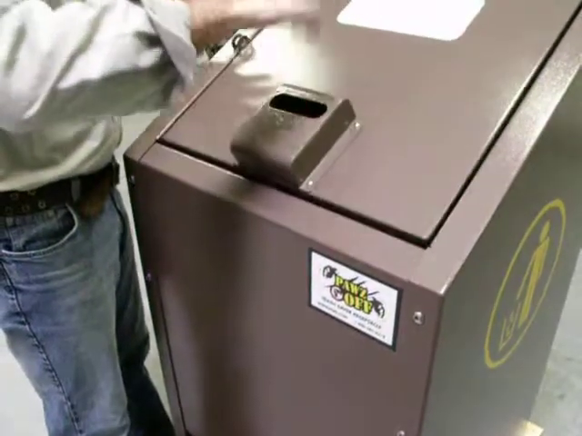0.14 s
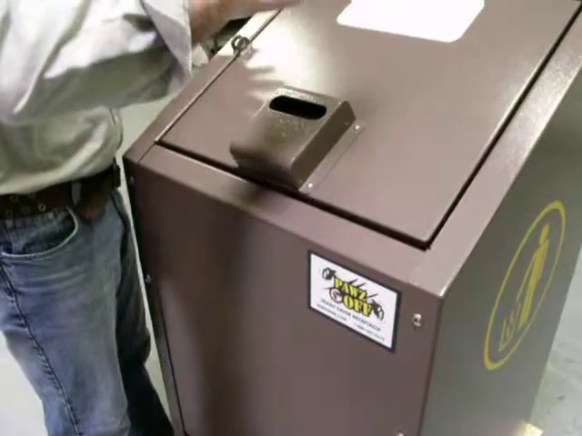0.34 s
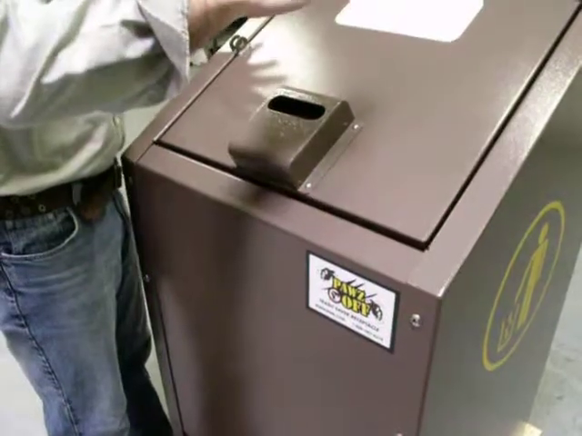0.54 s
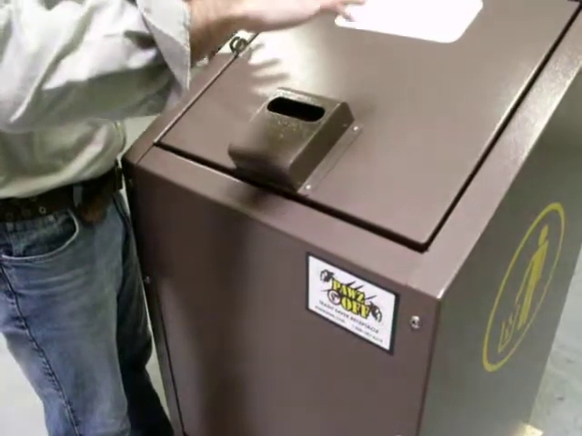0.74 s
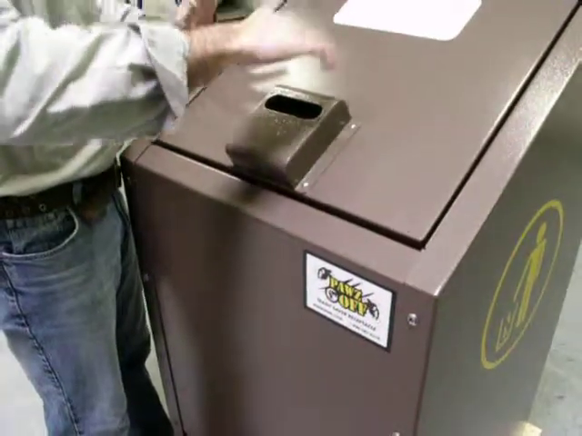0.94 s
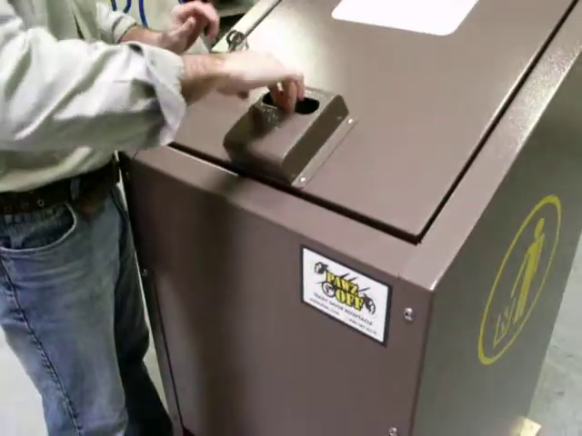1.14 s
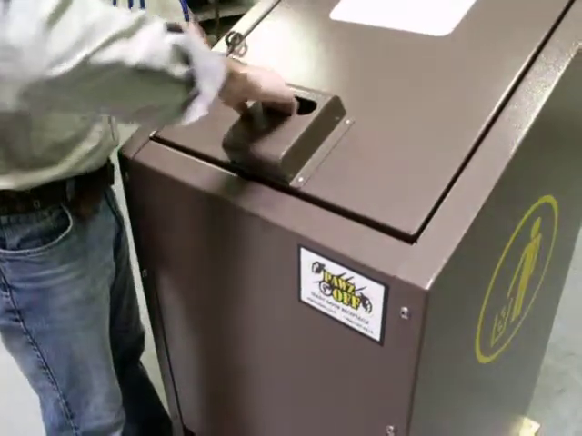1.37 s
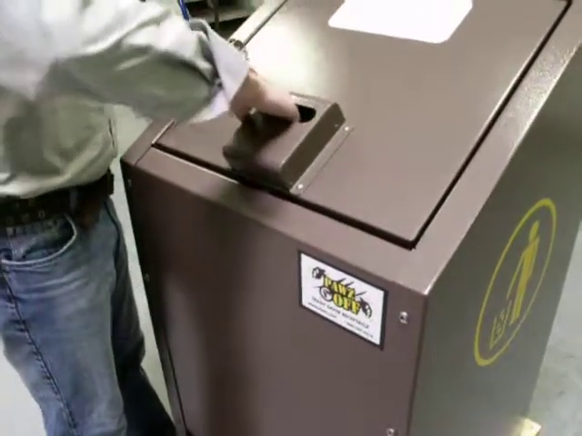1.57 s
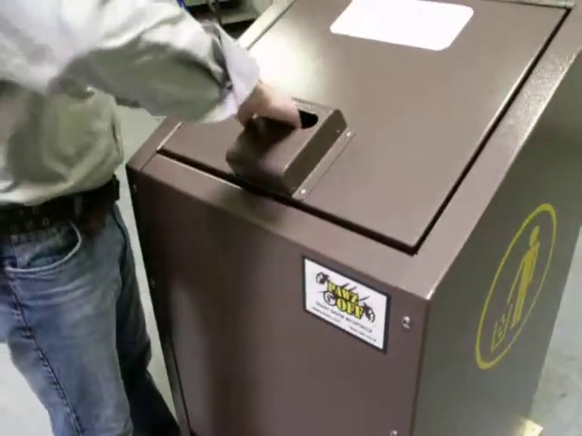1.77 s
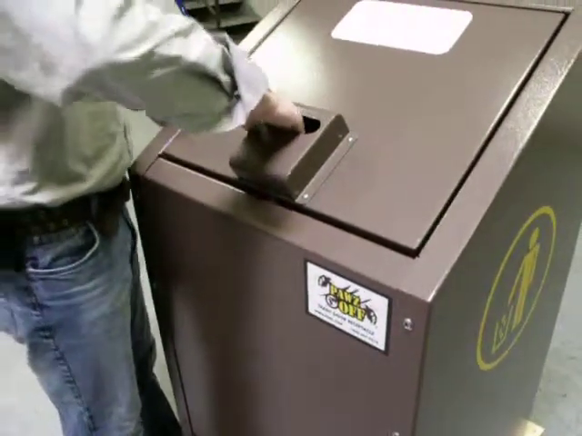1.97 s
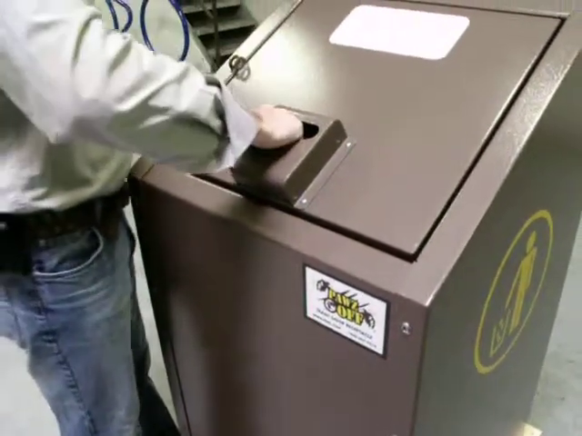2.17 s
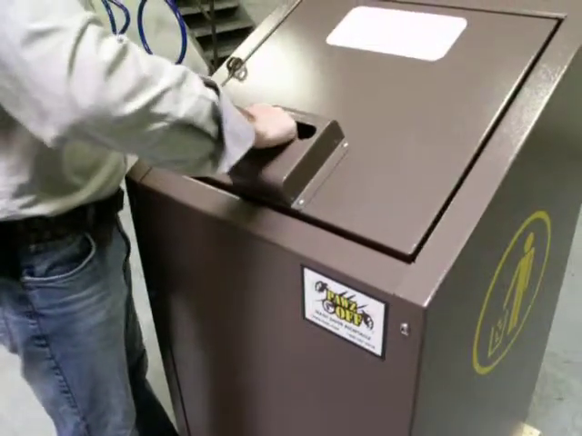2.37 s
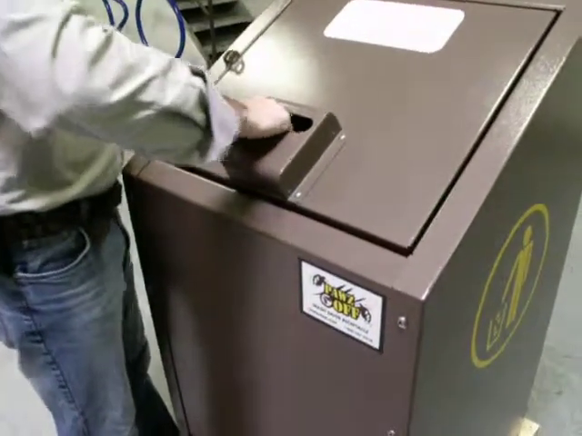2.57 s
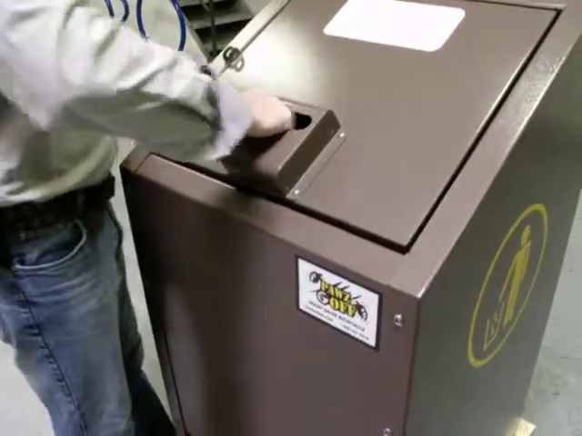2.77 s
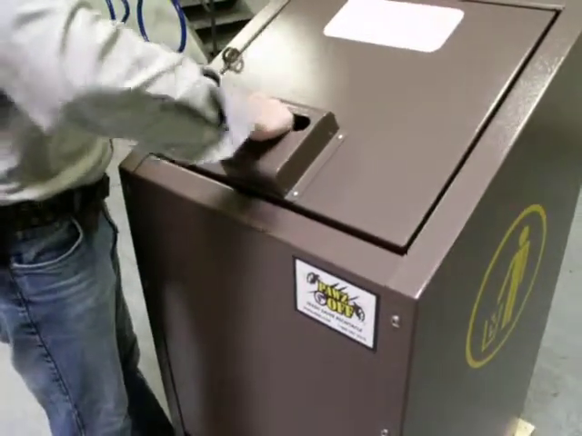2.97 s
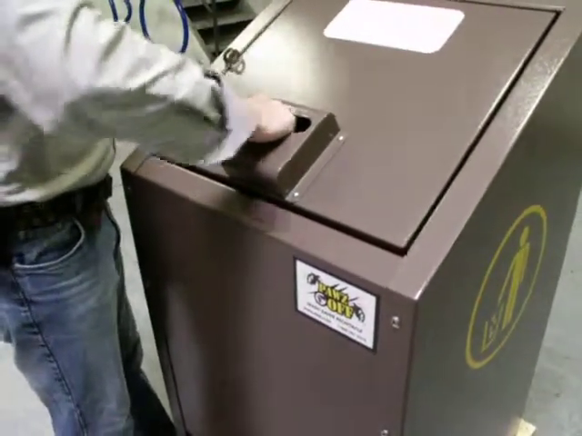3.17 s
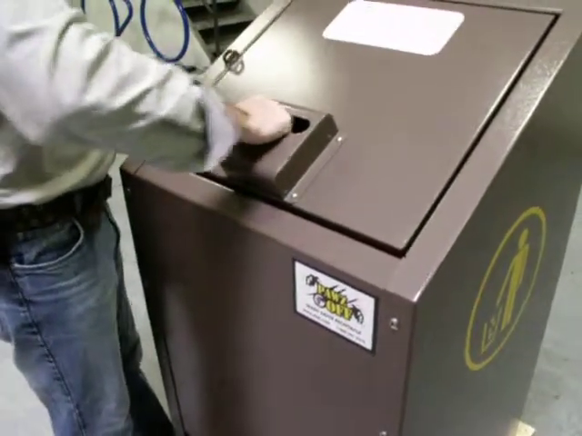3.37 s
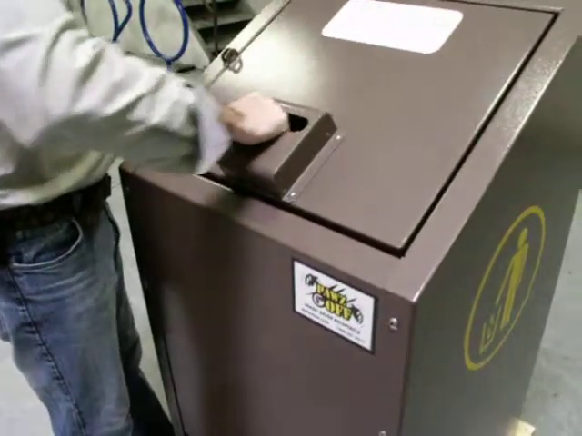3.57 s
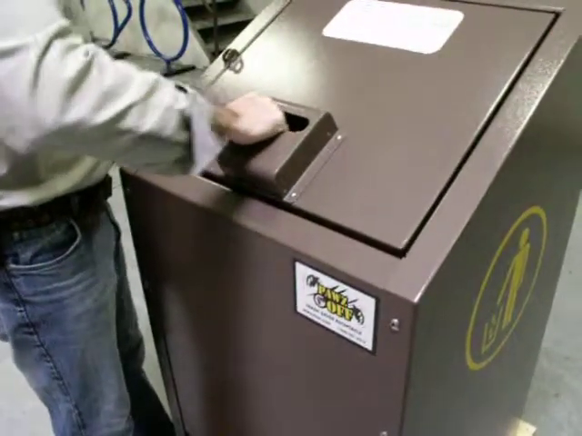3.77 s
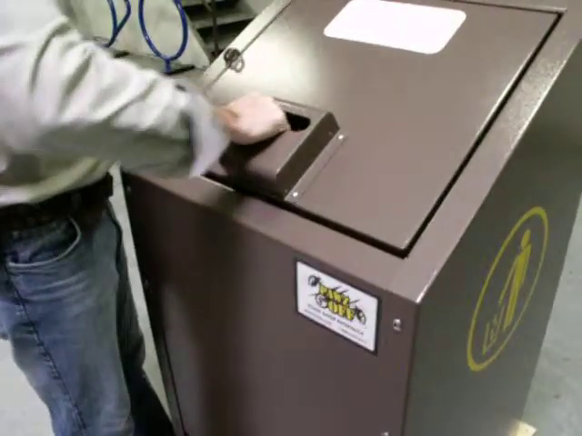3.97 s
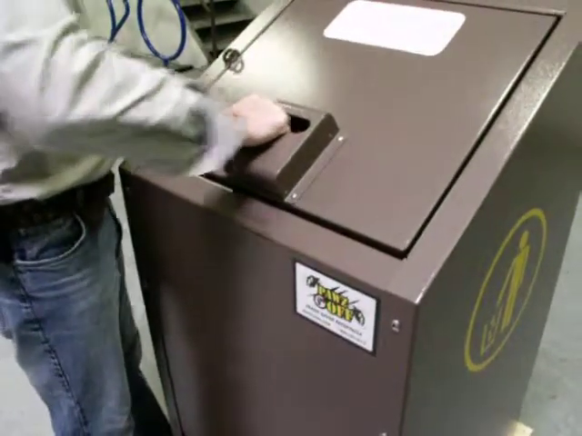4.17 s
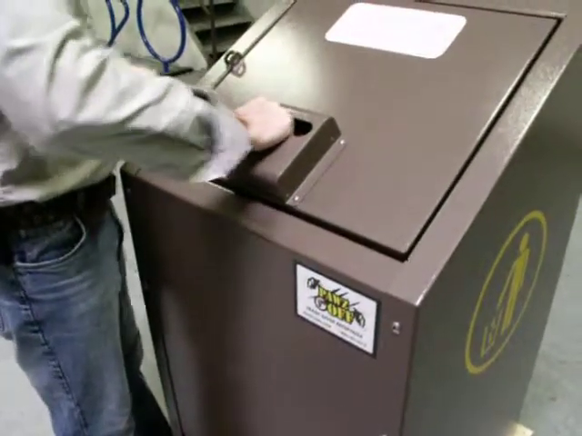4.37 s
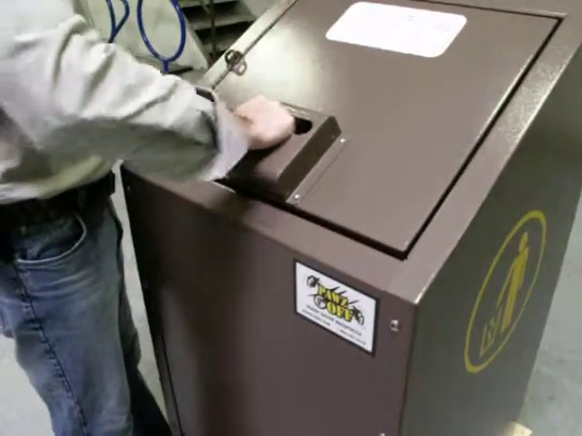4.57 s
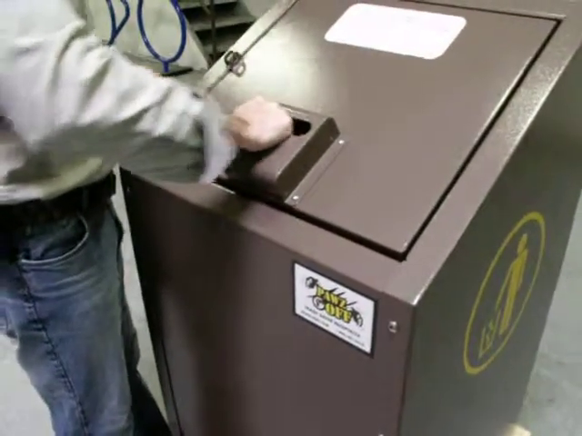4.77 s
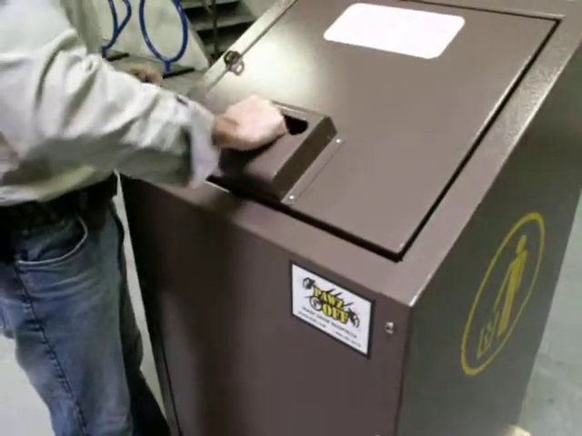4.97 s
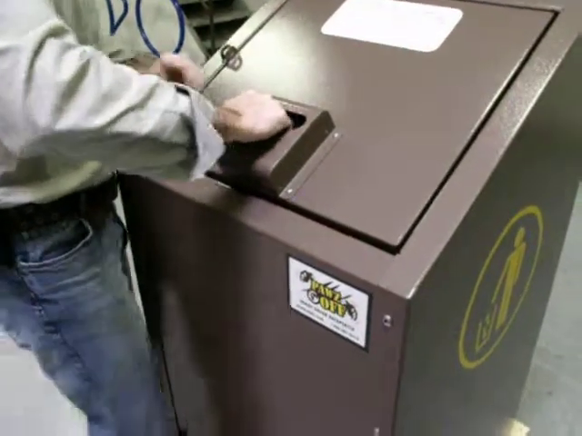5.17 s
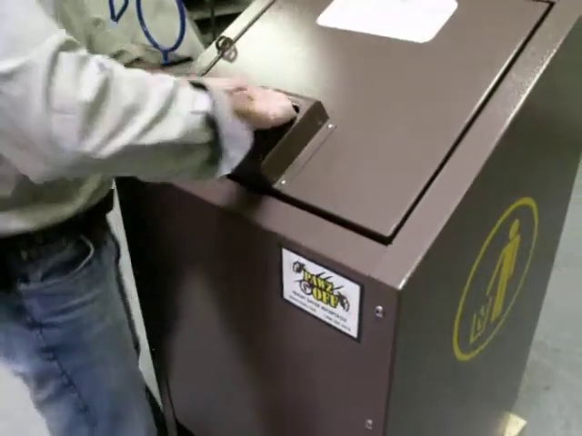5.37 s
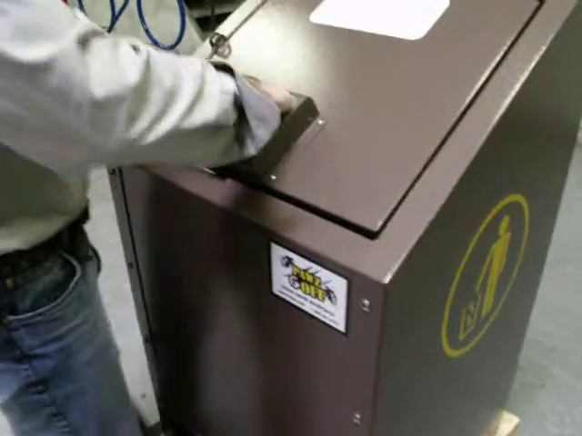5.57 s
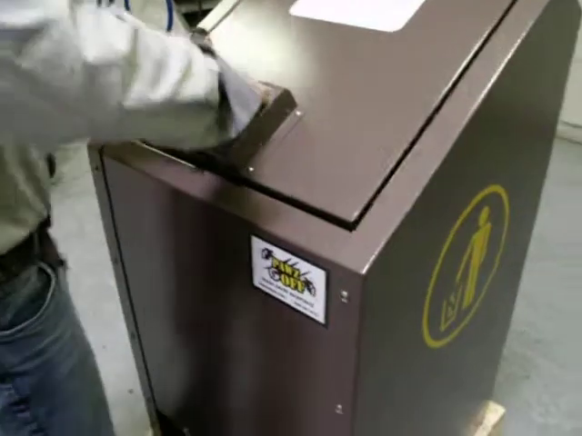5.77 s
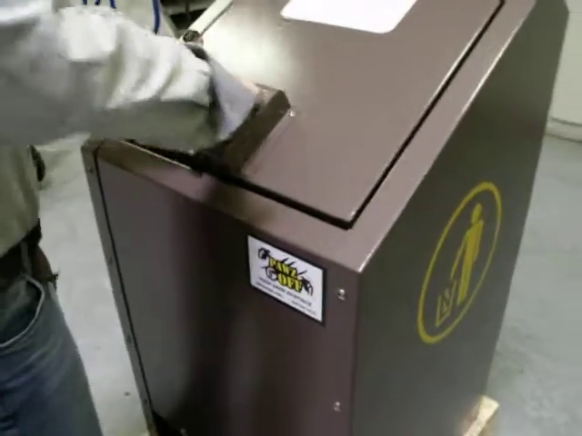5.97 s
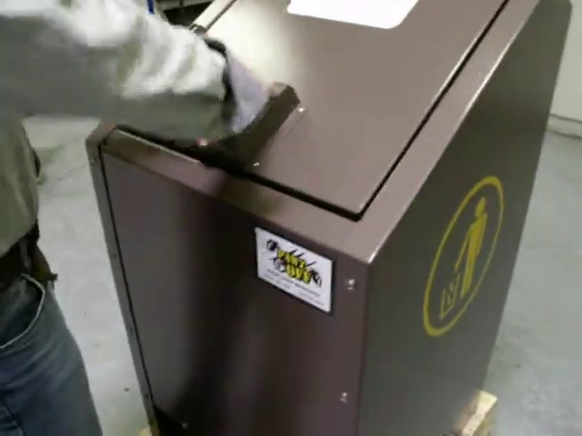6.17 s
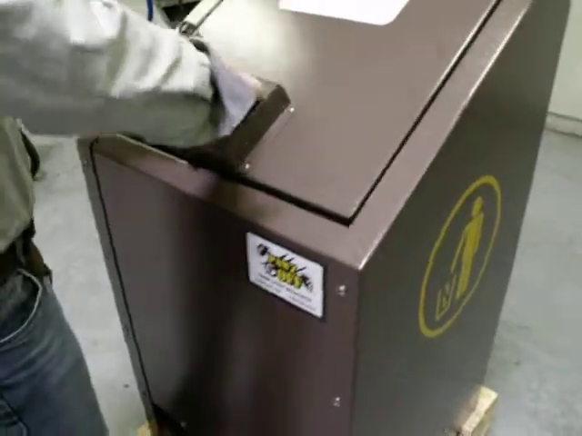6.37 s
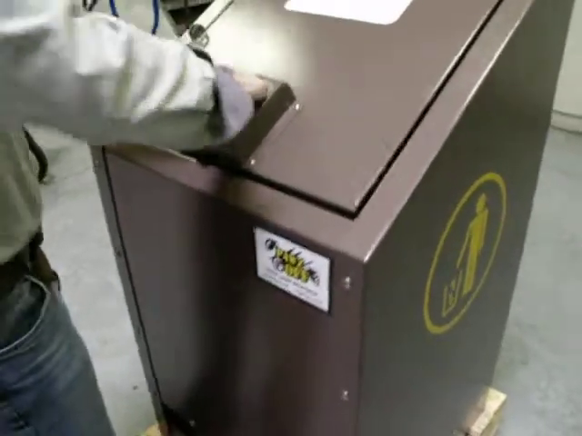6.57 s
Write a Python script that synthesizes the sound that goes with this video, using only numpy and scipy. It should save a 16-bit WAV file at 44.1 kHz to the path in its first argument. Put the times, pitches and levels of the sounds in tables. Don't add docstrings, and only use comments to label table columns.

```python
import sys
import numpy as np
from scipy import signal
from scipy.fft import irfft
from scipy.io import wavfile
from scipy.ndimage import uniform_filter1d

SR = 44100
rng = np.random.default_rng(int(sys.argv[2]) if len(sys.argv) > 2 else 0)


def wrap_up_sound(samples):
    columns = np.atleast_2d(samples).T
    tamed = np.clip(columns, -1, 1)
    steps = np.round(tamed * 32767).astype(np.int16)
    wavfile.write(sys.argv[1], SR, steps)


def makeup_ratio(level_db):
    decades = np.asarray(level_db, float) / 20
    return 10 ** decades


N = 292824
RING = 20480

# start_s, force_db, latch_side_db, grip_db
KNOCKS = [
    (.134, 5, 7.5, 9),
    (1.7225, -17.5, 4, 19.5),
    (2.0313, -12.5, -2, 11.5),
    (2.2963, -15.5, 4.5, -1.5),
    (2.4575, -9, 3.5, 9),
    (5.7075, -21, 9, 9),
    (6.1403, -4.5, 6.5, 5),
    (6.4003, -5.5, 6.5, 1.5),
    (6.489, 4, 6.5, 15.5),
]


def evened(x):
    return x / np.sqrt(np.mean(x ** 2, axis=-1, keepdims=True) + 1e-20)


def read(points, hz):
    f, value = np.transpose(points)
    return np.interp(np.log(hz + 1), np.log(f + 1), value)


def slow(rate_hz, count):
    t = np.arange(0, N + 512, 256) / SR
    f = np.geomspace(rate_hz / 20, rate_hz, num=16)[:, None, None]
    phase_turns = rng.random((16, count, 1))
    waves = np.sin(2 * np.pi * (f * t + phase_turns)) / np.sqrt(f)
    return evened(np.sum(waves, axis=0))


def contact(rows, bin_db, bin_follow, bolt_db, bolt_follow):
    s, lid, side, grip = np.transpose(rows)
    latch = lid + side
    return np.transpose([s, latch, lid, bin_db + bin_follow * lid, bolt_db + bolt_follow * latch, grip])


def contacts():
    # start_s, force_db, grip_db
    tugs = [(2.7235, -8, 8.5), (2.968, -9.5, 7.5), (3.185, -9, 3), (3.4249, -9.5, -6), (3.653, -8.5, 2),
            (3.8861, -8, -3.5), (4.1242, -5, -4.5), (4.346, -6, -4.5), (4.5786, -7.5, -4.5),
            (4.814, -5.5, -4), (5.884, -1.5, 11.5), (6.3112, -5.5, -2)]
    # start_s, force_db, latch_side_db
    bounces = [
        (.1898, -13.5, 15),
        (.2482, -20, 7),
        (.2793, -26, 15),
        (.3244, -20, 4),
        (.365, -40, 12),
        (.4197, -35, 2),
        (6.5606, -7, 13),
    ]
    # start_s, force_db, latch_side_db
    clicks = [(2.533, -16, 5), (2.9133, -19, -1), (3.2785, -16.5, 4), (3.3032, -21, 14),
              (3.777, -20.5, 9.5), (4.0159, -18, 12.5), (4.2194, -15.5, -5), (4.4357, -16.5, 9),
              (4.7705, -15.5, -0.5), (4.9011, -24, 15), (5.057, -24, 14.5), (5.18, -14.5, 2.5),
              (5.7384, -22, -3)]
    # start_s, force_db, latch_side_db, grip_db
    settles = [(1.797, -34, 9, 0), (1.8478, -45, -7, -1), (2.1384, -22, -25, -12), (2.3649, -22.5, 2.5, 4),
               (2.5969, -21, 11, -2), (2.7897, -16, 2, -11), (2.8177, -20, 3, 8), (3.0594, -16, -11, 5),
               (3.3596, -13, -2, -5), (3.8095, -16, 6.5, -18), (4.4992, -17, 5.5, -9),
               (4.6833, -23.5, 13.5, 6), (4.9292, -15.5, 4.5, 10), (5.0894, -15.5, 8.5, 8),
               (5.2145, -17.5, 4.5, 2), (5.3091, -18, 5.5, -20), (5.3693, -20, 1.5, -16),
               (5.4351, -18, 4, -25.5), (5.8374, -21, -1, -13), (5.9993, -14.5, 8, 6),
               (6.2476, -13, 5, 3.5), (6.4601, -8.5, -14, -7)]

    tugs = np.insert(tugs, obj=2, values=6, axis=1)
    bounces = np.insert(bounces, obj=3, values=16.5, axis=1)
    clicks = np.insert(clicks, obj=3, values=-5.5, axis=1)
    rows = np.vstack([
        contact(tugs, bin_db=-10, bin_follow=0.71, bolt_db=-10.5, bolt_follow=1.0),
        contact(KNOCKS, bin_db=-9, bin_follow=0.55, bolt_db=-37, bolt_follow=0.69),
        contact(bounces, bin_db=-7.5, bin_follow=0.44, bolt_db=-15.5, bolt_follow=0.45),
        contact(clicks, bin_db=-13.5, bin_follow=0.24, bolt_db=-7.5, bolt_follow=0.97),
        contact(settles, bin_db=-4.5, bin_follow=1.0, bolt_db=-29.5, bolt_follow=1.0)])
    return rows[np.argsort(rows[:, 0])]


def part(clear, lo_hz, hi_hz, count):
    # freq_hz, level_db
    crowd_levels = [(50, -19.5), (150, -7), (400, -11), (600, -1), (900, -15), (1300, -13), (2500, -16),
                    (3700, -22), (4400, -24), (4850, -18), (5300, -16.5), (6500, -24.5)]
    # freq_hz, t60_s
    crowd_decays = [(60, 0.24), (300, 0.42), (700, 0.25), (1500, 0.65), (3000, 0.43), (4300, 0.46),
                    (4850, 0.18), (6000, 0.096)]

    crowd_hz = np.linspace(lo_hz, hi_hz, count) + rng.uniform(-3, 2.84, count)
    crowd = np.transpose([crowd_hz, read(crowd_levels, crowd_hz), read(crowd_decays, crowd_hz)])
    hz, db, t60_s = np.vstack([clear, crowd]).T
    f = np.fft.rfftfreq(RING, 1 / SR)[:RING // 6]
    modes = 1 / (np.log(1000) / t60_s[:, None] + 2j * np.pi * (f - hz[:, None]))
    spread, turn = rng.random((len(contacts()), len(hz), 2)).transpose(2, 0, 1)
    strengths = makeup_ratio(db + 6.7 * (spread - 0.5)) * np.exp(2j * np.pi * turn)
    rings = irfft(strengths @ modes, RING)
    return rings / np.sqrt(np.mean(rings[:, :1500] ** 2, axis=1, keepdims=True))


def blows():
    # freq_hz, level_db, t60_s
    bolt_modes = [(4600, 1.8, 0.089), (4770, 14, 0.033), (4880, 2.5, 0.013), (4980, 4.2, 0.026),
                  (5140, 4, 0.048)]
    # freq_hz, level_db, t60_s
    latch_modes = [(1579, -1.5, 0.73), (1660, -4.5, 0.98), (1958, 3.5, 0.2), (2238, 1, 0.4),
                   (2320, -14.5, .3), (2647, 2.5, 0.19), (2917, -4, 0.41), (3107, -9.5, 0.37)]
    # freq_hz, level_db, t60_s
    lid_modes = [(423.7, -13, 1), (462, -3.5, 0.2), (527.3, -10, 1), (562, 0.5, 1), (603, -1, 0.95),
                 (643.5, -1, 0.36), (669.5, -2, 0.8), (754, -3.5, 0.31), (854, 3, 0.32), (979.5, -3, 0.88),
                 (1082, 2, 0.21), (1222, -1.5, 0.35)]
    # freq_hz, level_db, t60_s
    bin_modes = [(73.1, -3, 0.53), (135.6, -8.5, 0.5), (196.6, 1, 0.78), (230.4, 0, 0.58), (256, -7, 0.9),
                 (337.5, -4, 0.94)]

    s, latch_db, lid_db, bin_db, bolt_db, grip_db = contacts().T[:, :, None]
    t = np.arange(RING) / SR
    onset_s = t * makeup_ratio(0.72 * np.minimum(grip_db, 5))
    bolt = makeup_ratio(bolt_db - 3.0) * part(bolt_modes, 4500, 4100, count=16)
    bolt *= 1 - np.exp(-onset_s / 0.0032)
    latch = makeup_ratio(latch_db - 10) * part(latch_modes, 1300, 6300, count=900)
    latch *= 1 - np.exp(-onset_s / 0.0047)
    lid = makeup_ratio(lid_db - 0.86) * part(lid_modes, 402.5, 1300, count=150)
    lid *= 1 - np.exp(-onset_s / 0.0098)
    walls = makeup_ratio(bin_db - 1.5) * part(bin_modes, 35.0, 402.1, count=60)
    walls *= 1 - np.exp(-t / 0.021)

    flutter = evened(uniform_filter1d(rng.standard_normal((len(s), RING)), size=300, axis=1))
    fade = makeup_ratio(1.55 * flutter - 25.2 * makeup_ratio(grip_db) * t)
    fade *= np.hanning(2 * RING)[RING:] ** 0.5
    fade *= np.minimum(t / 0.0031, 1) ** 1.2
    rings = (bolt + latch + lid + walls) * fade

    out = np.zeros(N + RING)
    starts = np.round((s[:, 0] - 0.0022) * SR).astype(int)
    for start, ring in zip(starts, rings):
        out[start:start + RING] += ring
    return out[:N]


def slam():
    # freq_hz, first_drop_db, last_drop_db, t60_s, rise_s
    panel_modes = [(191, 2, -1.5, 0.61, 0.12), (333.7, -10.5, -2.5, 0.98, 0.052),
                   (497, 5, 3.5, 0.09, 0.0062), (586, 0.5, -20.5, 0.42, 0.052), (678, 6, -2, 0.49, 0.0063),
                   (737, -21, -0.5, 0.49, 0.03), (1207, 1.5, -2.5, 0.41, 0.038)]

    hz, first_db, last_db, t60_s, rise_s = np.transpose(panel_modes)[:, :, None]
    t = np.arange(SR // 2 + SR // 4) / SR
    out = np.zeros(N + SR)
    for start_s, db in ((KNOCKS[0][0], first_db), (KNOCKS[-1][0], last_db)):
        settling = (t / t60_s) ** 2
        swell = makeup_ratio(db - 60 * settling) * (1 - np.exp(-t / rise_s))
        rings = swell * np.sin(2 * np.pi * hz * t)
        out[round(start_s * SR):][:len(t)] += rings.sum(0)
    return out[:N]


def scrapes():
    # end_s, length_s, level_db, freq_hz
    slides = [
        (0.13, 0.028, -20.5, 600),
        (1.83, .04, -45, 4000),
        (2.455, .02, -26.5, 900),
        (5.705, .09, -39, 3500),
        (6.138, .04, -19, 700),
    ]
    slips_per_s = 3100

    slips = (rng.random(N) < slips_per_s / SR) * rng.standard_normal(N)
    t = np.arange(N) / SR
    out = np.zeros(N)
    for end_s, length_s, db, hz in slides:
        bandpass = signal.butter(2, [hz / 2.3, hz * 1.3], "band", fs=SR, output="sos")
        band = evened(signal.sosfilt(bandpass, slips))
        u = np.clip((t - end_s) / length_s + 1, 0, None)
        growth = np.minimum(u, 1) ** 0.59
        decay = makeup_ratio(-40 * np.maximum(u - 1, 0))
        out += makeup_ratio(db) * band * growth * decay
    return out


def thuds():
    # start_s, freq_hz, level_db, length_s
    rocks = [
        (2.406, 70.8, -27.5, .12),
        (4.629, 74, -25, 0.096),
        (5.704, 74.5, -24, 0.18),
    ]

    s, hz, db, length_s = np.transpose(rocks)[:, :, None]
    t = np.arange(N) / SR - s
    swell = np.sin(np.pi * np.clip(t / length_s, 0, 1)) ** 2
    return np.sum(makeup_ratio(db) * swell * np.sin(2 * np.pi * hz * t), axis=0)


def hall(x):
    # freq_hz, t60_s
    hall_decays = [(120, 0.86), (400, 1), (1000, 1), (2500, 0.87), (6000, 0.53)]

    hz, t, z = signal.stft(x, SR, nperseg=512, noverlap=384)
    fed = uniform_filter1d(abs(z) ** 2, size=3, axis=0)
    fed = np.pad(fed, ((0, 0), (7, 0)))[:, :len(t)]
    keep = makeup_ratio(-120 * t[1] / read(hall_decays, hz))
    stored = np.array([signal.lfilter([1 - k], [1, -k], row) for k, row in zip(keep, fed)])
    a, b = rng.standard_normal((len(t), len(hz), 2)).T
    field = np.sqrt(abs(stored)) * (a + 1j * b)
    return np.sqrt(2) * signal.istft(field, SR, nperseg=512, noverlap=384)[1][:N]


def fan():
    # freq_hz, level_db
    orders = [(59.7, -47), (77.9, -41.5), (156.1, -29.5), (233.9, -42), (468.3, -41.5), (552, -45.5),
              (630, -40), (704, -45.5), (764.4, -43)]

    hz, db = np.transpose(orders)[:, :, None]
    steps = np.arange(N) / 256

    def wander(rate_hz):
        curves = slow(rate_hz, count=len(hz))
        return np.array([np.interp(steps, np.arange(len(c)), c) for c in curves])

    levels = wander(8)
    drifts = wander(5)
    turns = np.cumsum(hz * (1 + 0.00555 * drifts), axis=1) / SR
    waver_db = np.clip(hz / 200, 1, 3) * levels
    return np.sum(np.sqrt(2) * makeup_ratio(db + waver_db) * np.sin(2 * np.pi * turns), axis=0)


def air():
    # freq_hz, level_db
    wash_spectrum = [(15, -29), (30, -23), (50, -32), (75, -27.5), (110, -12.5), (250, -10.5), (500, -10.5),
                     (800, -13.5), (1200, -15.5), (2000, -23.5), (3500, -33), (5200, -38.5), (7000, -46)]

    swell = slow(6.4, count=1)
    hz = np.fft.rfftfreq(1024, 1 / SR)
    a, b, patches = rng.standard_normal((swell.shape[1], 513, 3)).T
    patches = uniform_filter1d(patches, size=10, axis=0)
    patches = evened(uniform_filter1d(patches, size=12, axis=1))
    level_db = read(wash_spectrum, hz)[:, None] + 1.2 * patches + 0.2 * swell
    wash = signal.istft((a + 1j * b) * makeup_ratio(level_db), nperseg=1024, noverlap=768)[1]
    return makeup_ratio(-28.77) * evened(np.resize(wash, N))


def scene():
    steel = blows() + makeup_ratio(-10) * slam()
    mix = steel + makeup_ratio(-4) * hall(steel) + thuds() + air() + fan() + scrapes()
    return mix[None]


def band_limit(x):
    return signal.sosfilt(signal.butter(12, 15870, fs=SR, output="sos"), x)


def record(dry):
    mic_hz, edge_hz = 5180, 6090
    preamp, clip, offset = 0.73, 0.73, -0.0025
    saturated = np.clip(dry, -preamp, preamp)
    dull = signal.sosfilt(signal.butter(8, mic_hz, fs=SR, output="sos"), saturated)
    edge = signal.firwin(255, edge_hz, window=("kaiser", 9), fs=SR)
    dull = signal.oaconvolve(dull, edge[None], "same")
    clipped = np.clip(dull + offset, -clip, clip)
    return band_limit(clipped)


dry = scene()
out = record(dry)
wrap_up_sound(out)
```